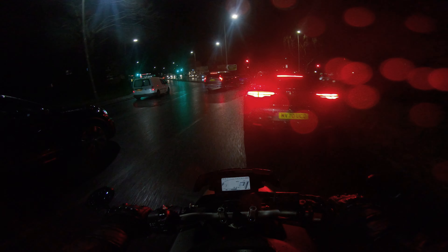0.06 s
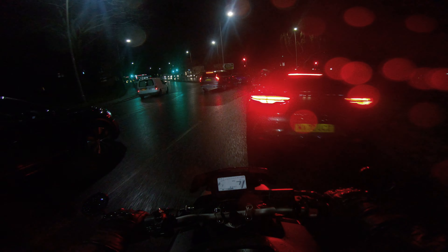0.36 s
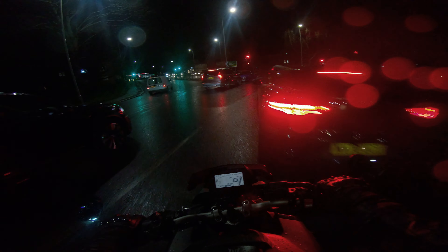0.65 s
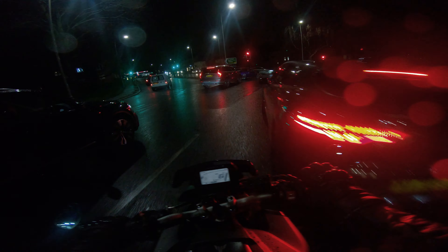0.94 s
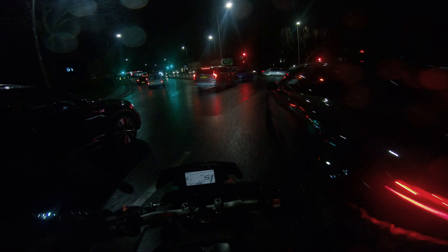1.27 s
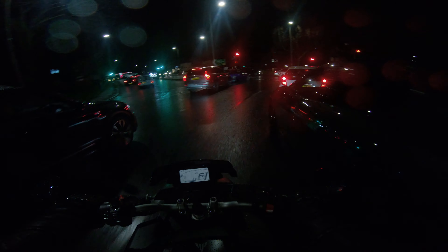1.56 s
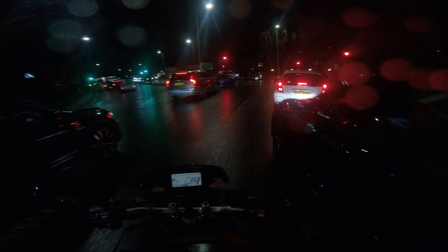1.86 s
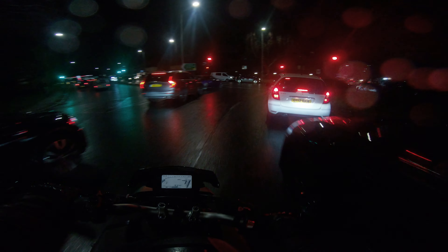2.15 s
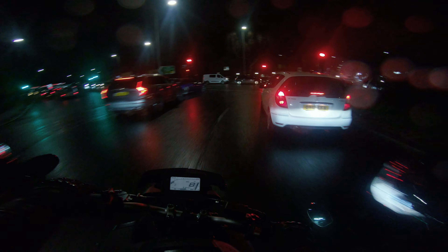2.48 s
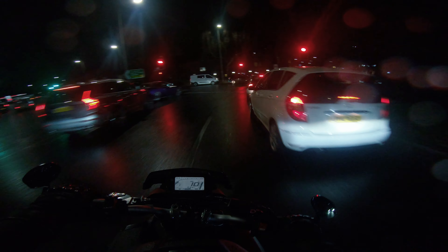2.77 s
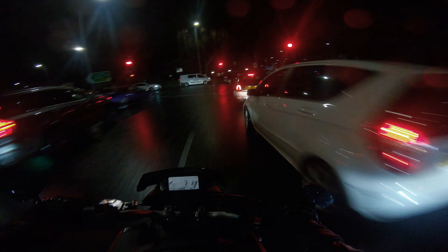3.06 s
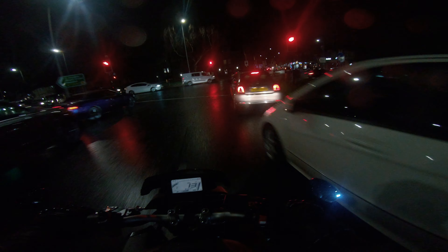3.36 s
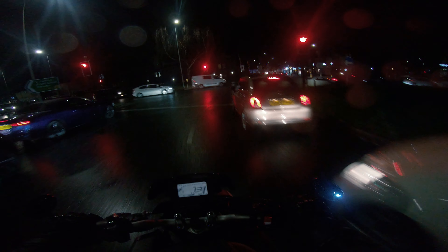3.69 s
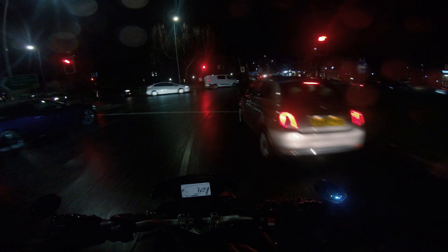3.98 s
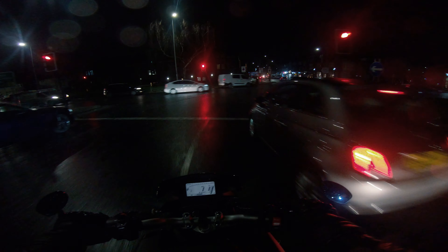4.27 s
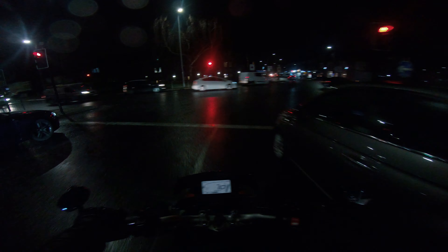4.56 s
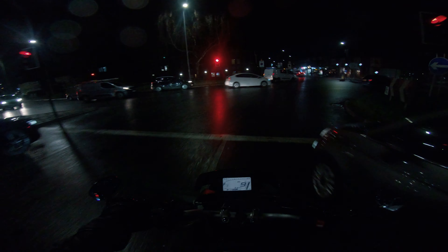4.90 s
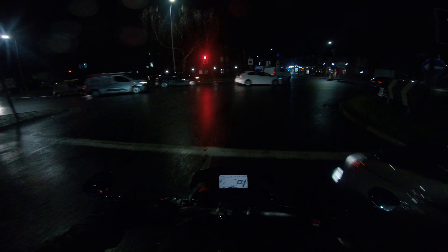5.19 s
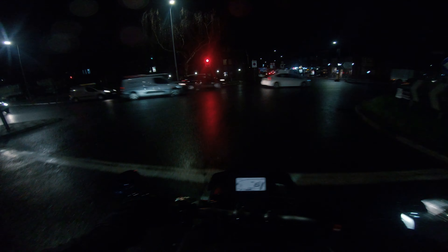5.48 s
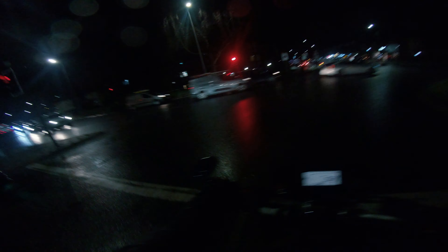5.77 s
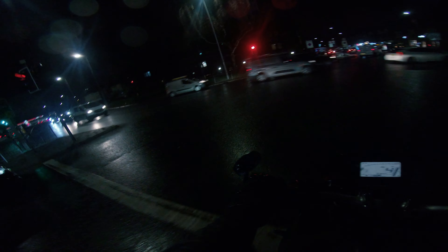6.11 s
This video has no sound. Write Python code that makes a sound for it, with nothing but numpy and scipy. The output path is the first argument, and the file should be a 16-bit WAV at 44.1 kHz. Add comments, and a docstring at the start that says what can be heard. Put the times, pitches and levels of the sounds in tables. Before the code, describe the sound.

A loud motorcycle lopes at idle, pulls with rising revs and barks, then pops and burbles back down to idle.

```python
"""A loud, loping V4 idle, heard from the seat of a motorcycle filtering past cars on a wet street.
The engine pulls for two seconds with rising revs, then the throttle shuts and it pops and burbles
back to idle. Uneven firings ring the exhaust and spit hiss; the hardest ones crack and bark.
Under them sit pinging header pipes, gear whine, engine clatter and the wash of wet tyres."""
import sys
import numpy as np
from scipy.fft import rfft, irfft, next_fast_len
from scipy.io import wavfile
from scipy.ndimage import map_coordinates

SR = 44100
rng = np.random.default_rng(int(sys.argv[2]) if len(sys.argv) > 2 else 0)


def materialize(psi):
    """Save the field psi as 16-bit PCM at rate SR to the path in sys.argv[1].

    A 1-D psi becomes a single channel; in a 2-D psi each row is a channel.
    """
    bounded = np.clip(np.atleast_2d(psi).T, -1, 1)
    quanta = np.round(bounded * 32767).astype(np.int16)
    wavfile.write(sys.argv[1], SR, quanta)


N = 270766

# engine speed: t/s, speed/rpm
REV_CURVE = [(0.0, 1240.0), (0.43, 1230.8), (0.49, 1307.2), (1.26, 1243.1), (1.32, 1422.1), (1.4, 1178.9),
             (1.56, 1331.0), (1.7, 989.7), (1.83, 1695.2), (1.99, 1570.9), (2.14, 1676.4), (2.51, 1710.6),
             (2.75, 1833.4), (3.18, 1856.3), (3.42, 2125.8), (3.65, 3447.5), (4.2, 1166.6), (4.28, 1584.7),
             (4.37, 1269.3), (6.14, 1224.5)]
# the rider's hand: t/s, throttle/0-1, firing level/dB
THROTTLE_MOVES = [(0, .2, -5), (1.73, 0.17, -4), (1.785, 0.27, 2.7), (1.86, 0.4, 2.9), (2.05, 0.29, 2),
                  (2.6, 0.49, -0.5), (3.1, 0.64, -1), (3.42, 0.67, 0), (3.655, 1, 1.5), (3.7, 0, -12),
                  (4.08, 0.09, -11), (4.35, 0.15, -5.5), (5.3, 0.14, -4.5), (6.14, .24, -5.5)]
# the lope: each cylinder's firing point/cycles
FIRING_POINTS = [0, .12, .36, .752]
# each cylinder's voice: level/dB, boost at full throttle/dB, bite/added throttle, hiss/dB
CYLINDER_VOICES = [(3.84, -3, -0.018, .5), (-2, 5.5, 0.13, 2), (2.3, -1.5, 0.022, 2), (-2.5, 4, -0.071, 1)]
# exhaust resonances: f/Hz, width/Hz, level/dB at idle, at half throttle, at full throttle
PIPE_MODES = [(51.3, 31.7, 13, 9, 5), (81.8, 68, 1, 9, -1.5), (126, 94, 2.5, 8, 4),
              (189.6, 121, -2, -2, 5.5), (280.2, 110.6, -3, 1, 6.5), (386.6, 173, -16, -1, 9),
              (473, 44, -41, -18.5, 6), (703.2, 148, -28, -19, 4.5), (910, 430, -48.5, -24.5, -14.5),
              (1118, 190, -41, -26.5, -4.5), (1830, 1500, -51, -50, -35.5)]
# a soft blast dips before it crests, a hard one leads with its front: throttle/0-1, phase/rad
BLAST_SKEW = [(0, 1.15), (.45, 0.78), (.8, .05)]
# afterfire until the engine catches again: t/s, bite/throttle, level/dB
AFTERFIRE = [(3.767, 0.57, 0), (3.826, 0.72, -10), (3.872, 0.67, -13), (3.914, 0.56, -2.5),
             (3.971, .5, -6.5), (4.163, 0.36, -10.5)]
# tone of a blast's steep front: f/Hz, level/dB
CRACK_EQ = [(500, -28), (1300, 10), (2400, 1), (3500, -10), (5500, -23.5), (9000, -33), (15000, -41)]
# firings that snap harder than the rest: t/s, level/dB
BARK_HITS = [(3.025, -24), (3.09, -22), (3.154, -25), (3.217, -21), (3.341, -27), (3.397, -27),
             (3.453, -22.5), (3.502, -23.5), (3.624, -16.5)]
# tone of that snap: f/Hz, level/dB
BARK_EQ = [(250, -22), (480, -6.5), (580, -2.5), (710, 7.5), (900, 4), (1130, 3), (1400, -6.5), (2200, -18),
           (4000, -37.5), (9000, -52), (15000, -57)]
# booms on a shut throttle: t/s, length/s, level/dB
OVERRUN_BOOMS = [(3.67, .195, -27.5), (3.892, 0.27, -26)]
# tone of the ragged puffs: f/Hz, level/dB
BURBLE_EQ = [(100, -13), (240, 12), (430, 2), (520, -4.5), (680, 4.5), (900, -19.5), (1120, -8),
             (1500, -28.5), (4000, -66.5)]
# tone of the spitting gas: f/Hz, level/dB
GAS_EQ = [(600, -3), (1500, 10.5), (2500, 7.5), (3600, 3.5), (5000, 4.5), (6600, -6.5), (7900, -6.5),
          (9500, -9), (11500, -13.5), (15500, -22.5)]
# tone of the crankcase: f/Hz, level/dB
CHURN_EQ = [(150, 4.5), (400, 9), (520, -16.5), (620, 5.5), (720, -11), (850, -15.5), (1020, -5.5),
            (1105, -3.5), (1200, -15.5), (1500, -22.5), (3000, -56.5)]
# tone of the valve gear: f/Hz, level/dB
CLATTER_EQ = [(300, -4), (800, -1.5), (1200, -8.5), (1500, -10.5), (2300, -17.5), (3200, -26.5),
              (5000, -43), (9000, -56.5)]
# the gears sing out as the drive takes up: t/s, half width/s, level/dB
GEAR_SWELLS = [(1.87, 0.034, -53), (2.105, 0.041, -47)]
# header pipe resonances: f/Hz, level/dB, t60/s
HEADER_MODES = [(5030, -8, 0.012), (5350, -11.5, 0.012), (7500, -2.5, 0.013), (8030, -4.5, 0.015),
                (11300, -15, 0.015)]
# pings that stand out: t/s, level/dB
PING_ACCENTS = [(0.3244, -67), (0.6993, -66), (0.7961, -65), (1.7863, -59), (1.8876, -54), (1.9829, -57),
                (2.0577, -59), (2.3484, -63), (2.698, -59), (4.6194, -62)]
# a thin ring over the idle: t/s, half width/s, level/dB
RING_SWELLS = [(4.555, 0.022, -52.5), (5.4, .15, -59.5)]
# tone of wet tyres: f/Hz, level/dB
TYRE_EQ = [(500, -10), (2000, 2), (4000, 0), (5500, -3), (6800, -11), (10000, -15), (15500, -28)]
# cars going by: t/s, half width/s, level/dB
CAR_SWISHES = [(2.5, 0.41, -65), (3.82, .2, -69), (5.3, .35, -78.5)]
# stereo width of the noise layers: f/Hz, left-right correlation
STEREO_LIKENESS = [(200, .98), (600, 1), (1100, 0.97), (2000, 0.13), (5000, 0.53), (12000, 0.5)]
# balance of the mix: f/Hz, left minus right level/dB
BALANCE = [(60, 1.45), (125, -2), (250, -1.74), (500, -2), (1000, -4), (2000, 2), (4000, -1.5),
           (8000, -2.5)]
# the lows arrive on the right first: f/Hz, left delay/s
LEFT_LAG = [(1000, 35e-6), (3000, 0)]

IDLE_RPM, TOP_HZ = 1240, 15700
PULL_FROM, PULL_FULL = .29, .295  # throttle at which the engine starts to pull, and pulls fully


def exhaust(times, throttle, db, skirt=3.58, lead_s=.0008, preroll_s=.02, size=8192):
    """Each blast rings the pipe; an open throttle steepens it and wakes the upper resonances."""
    hz = np.fft.rfftfreq(size, 1 / SR) + 1
    bells = np.array([(1 + ((hz ** 2 - f ** 2) / (hz * w)) ** 2) ** -skirt for f, w, *_ in PIPE_MODES])
    levels = np.transpose([np.interp(throttle, [0, .5, 1], row[2:]) for row in PIPE_MODES])
    levels = levels + db[:, None] + .6 * rng.standard_normal(levels.shape)
    spectra = rfft(causal(np.sqrt(amp(levels) ** 2 @ bells)))
    skew = np.interp(throttle, *np.transpose(BLAST_SKEW))[:, None]
    # the pre-roll leaves room for the dip ahead of the crest
    thumps = irfft(spectra * np.exp(1j * (skew - 2 * np.pi * hz * preroll_s)))
    return -placed(times - lead_s - preroll_s, thumps)


def firings(cycles, jitter_s=.00015):
    """Four cylinders fire unevenly. Rows: time, cylinder number, then that cylinder's voice."""
    count = len(CYLINDER_VOICES)
    cycle, cylinder = np.divmod(np.arange(count * int(cycles[-1] + 1)), count)
    at = cycle + np.array(FIRING_POINTS)[cylinder]
    times = np.interp(at, cycles, np.arange(N) / SR) + jitter_s * rng.standard_normal(len(at))
    inside = (at > cycles[0]) & (at < cycles[-1])
    return np.array([times, cylinder, *np.array(CYLINDER_VOICES)[cylinder].T])[:, inside]


def pull(throttle):
    """How hard the engine pulls, 0-1; almost a switch."""
    return np.clip((throttle - PULL_FROM) / (PULL_FULL - PULL_FROM), 0, 1)


def cracks(times, throttle, db):
    """Under load the front of a blast steepens into a dry crack."""
    crack_db = -40.9 + 1.5 * db + 9.4 * np.minimum(throttle, 1) + 2 * rng.standard_normal(len(times))
    clicks = -placed(times - .0004, amp(crack_db)[:, None])
    return filtered(clicks, lambda hz: amp(along(CRACK_EQ, hz)))


def barks(delay_s=.0008, trim_db=-.5, size=2048):
    """The hardest blasts snap at the mouth of the pipe."""
    times, db = np.transpose(BARK_HITS)
    snap = causal(amp(along(BARK_EQ, np.fft.rfftfreq(size, 1 / SR)))[None])
    return -placed(times + delay_s, amp(db + trim_db)[:, None] * snap / np.abs(snap).max())


def overrun(cycles, times, attack_s=.041, release_s=.022, sag_db_per_s=25, fade_db_per_s=25.5):
    """With the throttle shut the engine pumps air: a boom that falls with the revs, and ragged puffs."""
    t = np.arange(N) / SR

    def gate(start, end):
        return np.clip((t - start) / attack_s, 0, 1) * np.clip(1 - (t - end) / release_s, 0, 1)

    level = sum(gate(start, start + length) * amp(db - sag_db_per_s * np.abs(t - start))
                for start, length, db in OVERRUN_BOOMS)
    boom = level * amp(.71 * wobble(25)) * unit(np.sin(2 * np.pi * 3 * cycles))
    shut, caught = OVERRUN_BOOMS[0][0], OVERRUN_BOOMS[-1][0] + OVERRUN_BOOMS[-1][1]
    puffs = bursts(times, 3 * rng.standard_normal(len(times)), rise_s=.001, t60=.06) * rush(BURBLE_EQ)
    return boom + gate(shut, caught) * amp(-33 - fade_db_per_s * np.abs(t - shut)) * puffs


def gas_hiss(times, db, pulling, idle_db=-78, pull_db=12.5):
    """Turbulent gas spits with every blast, far more when the engine pulls."""
    spits = bursts(times - .0012, db + 2.2 * rng.standard_normal(len(times)), rise_s=.0004, t60=.03)
    return amp(idle_db + pull_db * pulling) * spits * rush(GAS_EQ)


def clatter(times, rpm, pulling, churn_db=-45, idle_db=-51, pull_db=4, db_per_octave=5):
    """The crankcase churns; the valve gear clatters with the firings, louder with revs and load."""
    valve_db = idle_db + pull_db * pulling + db_per_octave * np.log2(rpm / IDLE_RPM)
    knocks = bursts(times, 2 * rng.standard_normal(len(times)), rise_s=.00098, t60=.087)
    churn = amp(churn_db + wobble(21)) * rush(CHURN_EQ)
    valves = amp(valve_db + .85 * wobble(20)) * rush(CLATTER_EQ)
    return unit(1 + .53 * knocks) * (churn + valves)


def whines(cycles, pulling, teeth_per_cycle=70, crest_s=2.79, crest_hz=717, hz_per_s=210):
    """The gears sing with the revs; the chain swells once, rising with road speed. Both flutter."""
    chain_hz = np.maximum(crest_hz + hz_per_s * (np.arange(N) / SR - crest_s), 0)
    gear = unit(np.sin(2 * np.pi * teeth_per_cycle * cycles + .5 * wobble(40)))
    chain = unit(np.sin(2 * np.pi * np.cumsum(chain_hz) / SR + 1.7 * wobble(45)))
    gear_level = amp(-75 + 8.5 * pulling) + swells(GEAR_SWELLS)
    chain_level = swells([(crest_s, .12, -42.5)])
    return amp(3.5 * wobble(60)) * (gear_level * gear + chain_level * chain)


def pings(times, cylinder, pulling, idle_db=-85.5, pull_db=18, first_db=13):
    """At idle only the first cylinder pings clearly; under load they all do, and a few stand out."""
    db = idle_db + pull_db * pulling + first_db * (cylinder == 0) * (1 - pulling)
    db += 3 * rng.standard_normal(len(times))
    accent_times, accent_db = np.transpose(PING_ACCENTS)
    return header_pipes(times, db) + header_pipes(accent_times, accent_db - 1)


def header_pipes(times, db, rise_s=.0004):
    """Each blast pings the thin header pipes, with a new colour every time."""
    t = np.arange(SR // 30) / SR
    rings = np.zeros((len(times), len(t)))
    for hz, level, t60 in HEADER_MODES:
        strength, detune, phase = rng.standard_normal((3, len(times), 1))
        tone = np.sin(2 * np.pi * (hz * (1 + .012 * detune) * t + phase))
        rings += amp(level + 1.3 * strength - 60 * t / t60) * tone
    return placed(times, amp(db)[:, None] * (1 - np.exp(-t / rise_s)) * rings)


def thin_ring(hz=1090):
    """A faint wavering tone comes and goes once the engine is back at idle."""
    level = swells(RING_SWELLS) * amp(2.7 * wobble(30))
    return level * unit(np.sin(2 * np.pi * hz * np.arange(N) / SR + 1.2 * wobble(35)))


def tyres(start_db=-89.5, db_per_s=2):
    """A bed of wet road hiss creeps up as the bike gathers speed and swells as the cars go by."""
    road = amp(start_db + db_per_s * np.arange(N) / SR)
    return np.hypot(road, swells(CAR_SWISHES)) * rush(TYRE_EQ)


def amp(db):
    """Decibels to gain."""
    return 10 ** (np.asarray(db) / 20)


def unit(x):
    """Scale to rms 1."""
    return x / np.sqrt(np.mean(x ** 2) + 1e-20)


def along(points, hz):
    """Read (f/Hz, value) points on a log frequency axis."""
    f, values = np.transpose(points)
    return np.interp(np.log(hz + 1), np.log(f + 1), values)


def curves(rows, at=None):
    """One automation lane for each column after t/s, per sample or at given times."""
    times, *columns = np.transpose(rows)
    return [np.interp(np.arange(N) / SR if at is None else at, times, c) for c in columns]


def swells(rows):
    """A fader ride up and down around each (t/s, half width/s, level/dB)."""
    t = np.arange(N) / SR
    return sum(amp(db) / (1 + ((t - crest) / width) ** 2) for crest, width, db in rows)


def wobble(rate):
    """A smooth random curve, rate knots a second."""
    return map_coordinates(rng.standard_normal(int(N * rate / SR) + 4), [np.arange(N) * rate / SR])


def filtered(x, response):
    """EQ x with a response given as a function of frequency."""
    size = next_fast_len(N + SR // 2)
    return irfft(rfft(x, size) * response(np.fft.rfftfreq(size, 1 / SR)), size)[..., :N]


def rush(eq):
    """Stereo noise of rms 1, narrow in the lows and wide in the treble."""
    def mid_side(hz):
        width = np.arccos(np.clip(along(STEREO_LIKENESS, hz), -1, 1)) / 2
        return amp(along(eq, hz)) * [np.cos(width), np.sin(width)]

    mid, side = filtered(rng.standard_normal((2, N)), mid_side)
    return unit(np.array([mid + side, mid - side]))


def placed(times, sounds):
    """Lay one row of sound on the track at each start time."""
    index = np.round(times * SR).astype(int)[:, None] + np.arange(sounds.shape[1])
    inside = (index >= 0) & (index < N)
    return np.bincount(index[inside], sounds[inside], N)


def bursts(times, db, rise_s, t60):
    """An envelope of rms 1 that jumps at each time and dies away."""
    t = np.arange(SR // 16) / SR
    return unit(placed(times, amp(db)[:, None] * (1 - np.exp(-t / rise_s)) * amp(-60 * t / t60)))


def causal(gain):
    """The tightest (minimum-phase) hit for each row of spectral gains."""
    cepstrum = irfft(np.log(gain + 1e-6))
    half = cepstrum.shape[1] // 2
    cepstrum[:, 1:half] *= 2
    cepstrum[:, half + 1:] = 0
    return irfft(np.exp(rfft(cepstrum)))


def rider_seat(hz):
    """Left and right responses: the exhaust sits to the rider's right, so the mix leans that way."""
    gains = amp(np.outer([.5, -.5], along(BALANCE, hz)))
    return gains * np.exp(np.outer([-1j, 1j], np.pi * hz * along(LEFT_LAG, hz)))


def scene():
    """The exhaust up front, over engine metal and wet road."""
    rpm = curves(REV_CURVE)[0]
    cycles = .64 + np.cumsum(rpm / 120) / SR  # four-stroke: two turns make a cycle
    times, cylinder, voice_db, load_db, bite, hiss_db = firings(cycles)
    throttle, drive_db = curves(THROTTLE_MOVES, times)
    pulling = pull(curves(THROTTLE_MOVES)[0])
    blast_db = drive_db + voice_db + load_db * throttle + .4 * rng.standard_normal(len(times))
    blasts = np.array([times, throttle + bite, blast_db])
    blasts_and_pops = np.hstack([blasts, np.transpose(AFTERFIRE)])
    pipe = amp(19) * exhaust(*blasts_and_pops) + cracks(*blasts) + barks()
    metal = pings(times, cylinder, pull(throttle)) + whines(cycles, pulling)
    metal = metal + clatter(times, rpm, pulling)
    breath = overrun(cycles, times) + gas_hiss(times, hiss_db, pulling)
    return filtered(pipe + breath + metal + tyres() + thin_ring(), rider_seat)


def record(dry):
    """A brick-wall high cut takes off the very top."""
    return filtered(dry, lambda hz: hz < TOP_HZ)


dry = scene()
out = record(dry)
materialize(out)
```